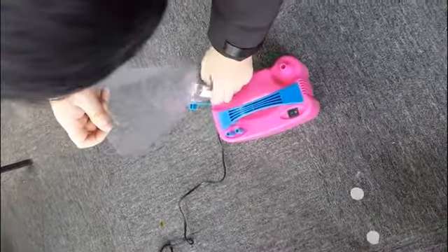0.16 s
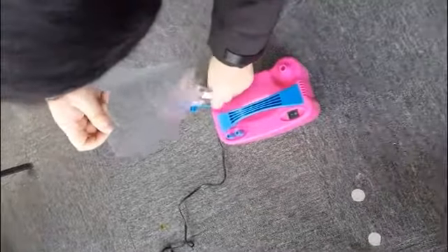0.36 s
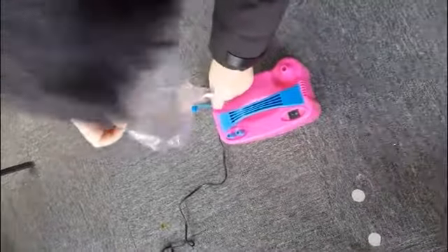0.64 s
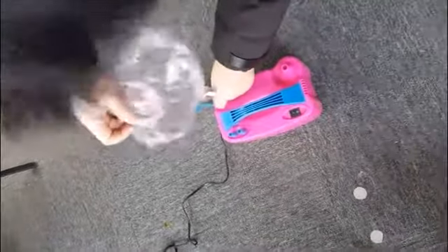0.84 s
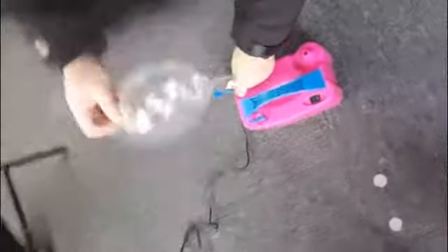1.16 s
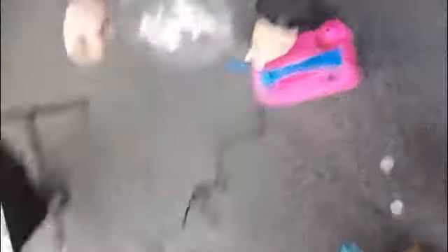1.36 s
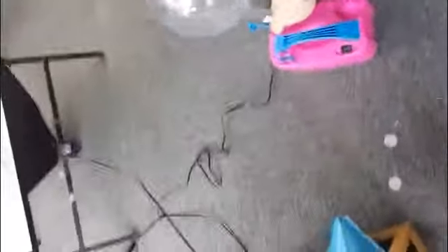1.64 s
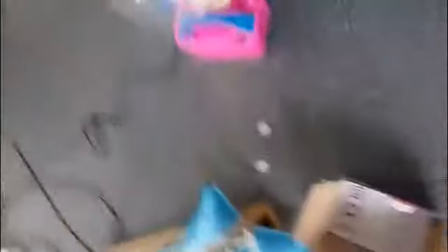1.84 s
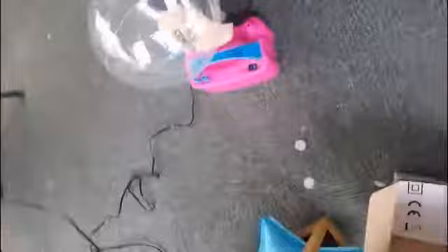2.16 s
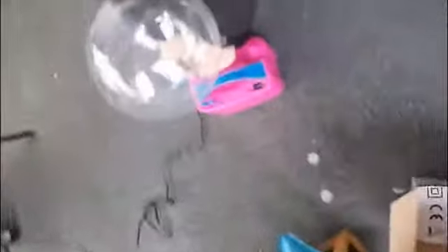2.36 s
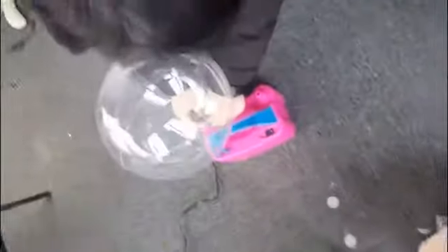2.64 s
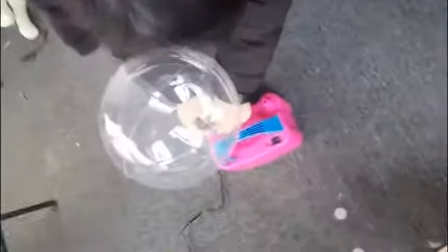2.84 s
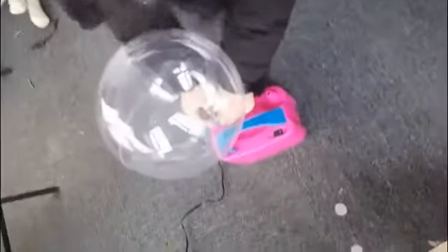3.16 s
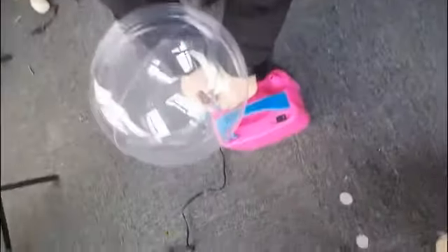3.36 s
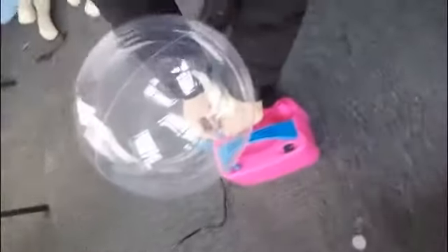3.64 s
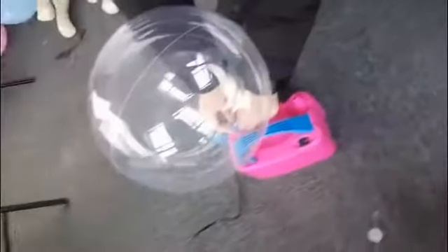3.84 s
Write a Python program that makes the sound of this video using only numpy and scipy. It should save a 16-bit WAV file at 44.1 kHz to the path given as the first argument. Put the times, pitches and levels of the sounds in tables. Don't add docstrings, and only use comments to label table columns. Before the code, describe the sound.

Quiet room hum, then a switch click and an electric blower racing up to speed; limp plastic flutters, then leaking air roars at the nozzle over the constant motor whine, heard close indoors.

```python
import sys
import numpy as np
from scipy import signal
from scipy.io import wavfile
from scipy.ndimage import uniform_filter1d

SR = 44100
rng = np.random.default_rng(int(sys.argv[2]) if len(sys.argv) > 2 else 0)


def master(y):
    cut = np.clip(np.atleast_2d(y).T, -1, 1)
    pcm = np.round(cut * 32767)
    wavfile.write(sys.argv[1], SR, pcm.astype(np.int16))


def volts(x):
    e = np.asarray(x, float) / 20
    return 10 ** e


N = 176400

# f/Hz, level/dB
HUM = [(18, -37), (30, -9), (60, 0), (82, -37.5), (118, -9.5), (598, -20.5), (1260, -16), (2540, -33),
       (14300, -55)]
# t/s, level/dB
HUM_RUSTLE = [(0, -3), (.035, 3), (.075, 0), (.12, -3), (.2, -8), (.3, -0.5), (.43, 0)]
# t/s, peak level/dB, f/Hz
SNAPS = [(.439, -40, 7000), (.441, -33, 1100), (.451, -30, 1380), (.455, -25, 280), (.467, -24, 250),
         (.5, -28, 970), (.475, -26, 2000), (.746, -22, 900), (.785, -17, 1500), (.825, -15, 600),
         (.892, -22, 1200), (2.165, -22, 900), (2.349, -18, 2000)]
# start t/s, length t/s, level/dB, centre f/Hz, width f/Hz
FLAPS = [(0.458, 0.13, -48, 290, 140), (0.45, 0.1, -39.5, 1970, 300), (0.483, 0.092, -42, 950, 220),
         (1.8, 0.36, -45, 300, 180), (0.678, 0.19, -35, 440, 500), (0.805, 0.18, -34.5, 400, 570),
         (0.585, 0.081, -40.5, 950, 210), (2.15, 0.12, -30.5, 740, 830), (2.857, 0.09, -40.5, 270, 86),
         (3.17, 0.97, -44.5, 290, 150), (1.43, 0.62, -51.5, 120, 300), (0.85, 0.122, -48, 146, 150),
         (0.54, .15, -53, 100, 84), (1.43, .2, -49, 310, 160), (2.1, .08, -45, 340, 80),
         (2.29, .07, -32, 6000, 5000), (.97, 0.29, -52.5, 110, 160), (3.3, .4, -37.5, 1180, 430),
         (.88, 0.066, -40.5, 2390, 170)]
# t/s, rush level/dB, leak level/dB, neck resonance f/Hz
AIR = [(.44, -29, -60, 1950), (.48, -30.5, -50, 1950), (.6, -28.5, -42, 2010), (.9, -26.5, -38.5, 2270),
       (1.05, -28.5, -41, 1980), (1.5, -27, -69, 2000), (2.0, -26.5, -42, 2260), (2.28, -25.5, -33, 2120),
       (2.31, -26.5, -29.5, 1960), (2.8, -26, -31.5, 2000), (3.2, -26, -30, 1860), (3.45, -25, -33, 1940),
       (3.65, -24.5, -30.5, 2080), (4.0, -26.5, -28, 2170)]
# f/Hz, level/dB per Hz
RUSH = [(50, -46), (120, -6), (280, -0.5), (700, 1), (1500, 2), (2500, 2), (5000, -1.5), (14300, -4.5)]
# f/Hz, level/dB per halving of speed
RUSH_LAW = [(60, -6.5), (300, 1), (1000, 1.5), (2000, 2), (4000, 5.5), (8000, 8.5), (14000, 14.5)]
# f/Hz, width f/Hz, level/dB
CASING = [(960, 200, 2), (2000, 500, 3.5), (3400, 600, 1.5), (8300, 2500, 2), (10900, 700, -3),
          (12400, 1200, 1)]
# t/s, order 1 level/dB, order 2 level/dB, order 3 level/dB
WHINE = [(0.47, -56, -61, -49), (0.58, -34, -44, -47), (0.66, -37, -35, -35), (0.76, -27.5, -39.5, -32),
         (0.93, -29.5, -31, -36), (1.03, -21, -38.5, -35), (1.17, -15.5, -36, -36.5),
         (1.3, -21, -32.5, -34), (1.45, -28.0, -43.0, -34), (1.6, -34, -40.5, -31),
         (1.8, -25.5, -36, -31.5), (2.1, -23.5, -31.5, -36.5), (2.35, -24, -33.5, -35),
         (2.65, -27.5, -32.5, -30), (3.1, -23.5, -35, -29), (3.45, -25.5, -47, -31),
         (3.7, -30.5, -29.5, -36.5), (3.97, -29.5, -37.5, -34)]
# t/s, order 1 level/dB, order 2 level/dB, order 3 level/dB
WHINE_SIDE = [(0.5, -64.3, -65, -63.3), (0.62, -45, -50.6, -48.6), (0.72, -34, -39, -45.6),
              (0.85, -39, -41, -45.1), (1.0, -42.1, -32, -41.0), (1.12, -34, -42, -42.9),
              (1.3, -32.4, -55, -48.5), (1.45, -26.5, -31, -41.8), (1.62, -30.6, -38, -54),
              (1.8, -35.5, -38, -35.0), (2.1, -32, -38.4, -33.2), (2.35, -33, -32, -30),
              (2.6, -40, -33, -28), (2.85, -37.5, -31.2, -30.2), (3.15, -31, -29, -40),
              (3.45, -32, -30.6, -34.8), (3.7, -32, -28, -44), (3.96, -32.4, -31, -33.4)]
# t/s, order 1 phase/rad, order 2 phase/rad, order 3 phase/rad
SIDE_PHASE = [(.6, 1.8, -.7, -.5), (.85, 1.2, -2.6, -1.1), (1.05, -1.5, -2.8, -1.9), (1.3, 1.1, -3, -2.2),
              (1.65, -.9, -2.9, -2.2), (2.1, -.7, -2.2, -2.1), (2.35, 1.6, -2.8, -3.3),
              (3.15, 1.6, -2.6, -3.5), (3.45, 1.3, -2.1, -5.6), (3.7, 1.4, -4.4, -8.4),
              (3.96, 1.6, -3.6, -7.3)]
HIGH_ORDERS = (4, 5, 7)
# t/s, order 4 level/dB, order 5 level/dB, order 7 level/dB
HIGH_WHINE = [(.5, -60, -58, -57), (.72, -41, -50, -58), (.85, -40, -56, -45), (1.0, -54, -52, -47),
              (1.3, -46, -58, -45), (1.45, -41, -47, -40), (1.62, -39.5, -48, -43),
              (1.8, -47, -44.5, -41.5), (2.1, -43, -46, -45.5), (2.35, -55, -44, -50), (2.6, -44, -50, -54),
              (2.85, -49, -55, -46), (3.15, -58, -58, -49), (3.45, -47, -49, -47), (3.96, -58, -52, -44)]
# f/Hz, width f/Hz, level/dB
STANDING = [(552, 14, 6), (574, 8, -9), (613, 6, -26), (619, 5, 4), (645, 8, 3), (934, 35, 8),
            (1035, 35, 6), (1096, 25, -5), (1140, 20, 4), (1240, 12, -16), (1255, 6, 16), (1266, 9, -14),
            (1545, 60, 9), (1650, 110, -10)]
# f/Hz, correlation/1
SAME = [(40, .5), (90, .8), (160, .95), (300, .95), (500, .8), (1100, .2), (2300, .25), (5000, .04)]
# f/Hz, level/dB
LEFT_DB = [(300, 0), (690, .5), (1260, -1.5), (2300, -1.5), (4300, .3), (8000, -.5), (13000, .6)]

SWITCH_S, SPIN_UP_S = .44, .004
TOP_HZ, SLOW_HZ, SLOW_S, QUICK_S = 666.7, 310, .28, .1
LOAD_S, LOAD_HZ, SAG_HZ_PER_S = 2.35, 2.5, 1.5
FLUTTER_DB, HIGH_FLUTTER_DB, JITTER_HZ = .7, 1.5, .8
SWEEP_FLUTTER_DB = 1.5
NULL_S, NULL_WIDTH_S, NULL_DB = 1.61, .018, -14
BOOST_DB, BOOST_S, BOOST_WIDTH_S = 15, .64, .05
SHADOW_DB, SHADOW_HZ = -3, 12100
NECK_WIDTH_HZ = 520
NECK_LOW, NECK_LOW_DB, NECK_LOW_WIDTH_HZ = 0.58, -11, 1100
HUM_DB = -49.5
ROOM_T60_S, ROOM_DB = .4, -2
RIPPLE_DB = 1.5
BALLOON_CENTRED = 0.75
LEFT_LAG_S = 2.5 / 44100
SIDE_GATE_HZ, SIDE_GATE_DB, SIDE_GATE_PATCHY_DB = 470, -12.5, 3.5
MIC_LOW_HZ, EDGE_HZ = 49, 14240


def evened(x):
    return x / np.sqrt(np.mean(x ** 2) + 1e-20)


def read(points, hz):
    f, value = np.transpose(points)
    return np.interp(np.log(hz + 1), np.log(f + 1), value)


def wander(t, lo, hi):
    rates = np.geomspace(lo, hi, num=16)
    return evened(sum(np.sin(2 * np.pi * (f * t + rng.random())) / np.sqrt(f) for f in rates))


def bump(hz, centre, width):
    return 1 / np.sqrt(1 + (2 * (hz - centre) / width) ** 2)


def smeared(x, bins, frames):
    return uniform_filter1d(uniform_filter1d(x, size=bins, axis=0), size=frames, axis=1)


def grid():
    return np.arange(N // 256 + 5) * 256 / SR, np.fft.rfftfreq(1024, 1 / SR)[:, None]


def noise(gain, patchy_db, flicker_db, centred=0):
    t, hz = grid()
    a, b, c, d, p, q = rng.standard_normal((len(t), 513, 6)).T
    field = patchy_db * evened(smeared(p, 10, 10))
    field += RIPPLE_DB * evened(smeared(q, 3, 40))
    field += flicker_db * wander(t, 4, 30) * np.clip(hz / 3000, 0, 1)
    same = np.clip(np.maximum(read(SAME, hz), centred), -1, 1)
    pan = read(LEFT_DB, hz) / 2
    left = a + 1j * b
    right = same * left + np.sqrt(1 - same ** 2) * (c + 1j * d)
    lag = np.exp(-2j * np.pi * hz * LEFT_LAG_S)
    z = np.array([left * volts(pan) * lag, right * volts(-pan)])
    return signal.istft(z * gain * volts(field) / 12, nperseg=1024, noverlap=768)[1][:, :N]


def room_tone():
    t, hz = grid()
    rustle = np.interp(t, *np.transpose(HUM_RUSTLE)) * np.clip(hz / 5000, 0, 1)
    return volts(HUM_DB) * evened(noise(volts(read(HUM, hz) + rustle), patchy_db=1.0, flicker_db=.8))


def snaps():
    t, out = np.arange(400) / SR, np.zeros(N)
    for s, db, hz in SNAPS:
        at = round(s * SR)
        out[at:at + 400] += volts(db) * np.exp(-t * hz * 1.8) * np.sin(2 * np.pi * hz * t)
    lag = np.arange(SR // 2) / SR
    tail = rng.standard_normal((2, SR // 2)) * volts(-60 * lag / ROOM_T60_S) * (lag > .004)
    tail = tail / np.linalg.norm(tail[0])
    return out + volts(ROOM_DB) * signal.fftconvolve(out[None], tail, axes=1)[:, :N]


def flaps():
    t, hz = grid()
    gain = 0
    for start, length, db, centre, width in FLAPS:
        u = np.clip((t - start) / length, 0, 1)
        swell = np.sin(np.pi * u) ** .4
        gain = gain + volts(db) * evened(bump(hz, centre, width) ** 3) * swell
    return noise(gain, patchy_db=2.5, flicker_db=2.5, centred=BALLOON_CENTRED)


def leak():
    t, hz = grid()
    s, _, level_db, neck = np.transpose(AIR)
    neck = np.interp(t, s, neck)
    main_mode = bump(hz, neck, NECK_WIDTH_HZ) ** 2
    low_mode = volts(NECK_LOW_DB) * bump(hz, NECK_LOW * neck, NECK_LOW_WIDTH_HZ) ** 2
    gain = evened(main_mode + low_mode) * volts(np.interp(t, s, level_db))
    return noise(gain, patchy_db=.5, flicker_db=.8, centred=BALLOON_CENTRED)


def speed(t):
    u = np.maximum(t - SWITCH_S, 0)
    run = TOP_HZ - SLOW_HZ * np.exp(-u / SLOW_S) - (TOP_HZ - SLOW_HZ) * np.exp(-u / QUICK_S)
    return run - LOAD_HZ / (1 + np.exp(-(t - LOAD_S) * 20)) - SAG_HZ_PER_S * np.maximum(t - LOAD_S, 0)


def rush():
    t, hz = grid()
    s, level_db = np.transpose(AIR)[:2]
    ducts = sum(db * bump(hz, f, w) ** 2 for f, w, db in CASING)
    colour = volts(read(RUSH, hz) + ducts)
    law = read(RUSH_LAW, hz) * np.log2(np.clip(speed(t - .006) / TOP_HZ, .05, 1))
    grown = np.clip(t - LOAD_S + .5, 0, 1)
    shadow = SHADOW_DB * grown / (1 + (SHADOW_HZ / (hz + 1)) ** 8)
    gain = evened(colour) * volts(law + shadow + np.interp(t, s, level_db))
    return noise(gain, patchy_db=1.0, flicker_db=0.87)


def whine():
    t = np.arange(N) / SR
    shaft = speed(t)
    jitter = JITTER_HZ * np.interp(t, t[::200], wander(t[::200], 1, 25.05))
    turn = 2 * np.pi * np.cumsum(shaft + jitter) / SR
    climbing = SWEEP_FLUTTER_DB * (1 - shaft / TOP_HZ) ** .5

    def flutter(db):
        return (db + climbing) * np.interp(t, t[::200], wander(t[::200], 1.565, 30))

    mid, side, out = np.transpose(WHINE), np.transpose(WHINE_SIDE), np.zeros((2, N))
    apart, high = np.transpose(SIDE_PHASE), np.transpose(HIGH_WHINE)
    for k in range(1, 4):
        mid_db = np.interp(t, mid[0], mid[k]) + flutter(FLUTTER_DB)
        mid_db += sum(db * bump(k * shaft, f, w) ** 2 for f, w, db in STANDING)
        if k == 1:
            mid_db += NULL_DB * np.exp(-((t - NULL_S) / NULL_WIDTH_S) ** 2)
        side_db = np.interp(t, side[0], side[k]) + flutter(FLUTTER_DB)
        m = volts(mid_db) * np.cos(k * turn)
        s = volts(side_db) * np.cos(k * turn + np.interp(t, apart[0], apart[k]))
        out += np.array([m + s, m - s])
    for row, order in enumerate(HIGH_ORDERS):
        db = np.interp(t, high[0], high[row + 1])
        if row == 0:
            db += BOOST_DB * np.exp(-((t - BOOST_S) / BOOST_WIDTH_S) ** 2)
        for port in range(2):
            out[port] += volts(db + flutter(HIGH_FLUTTER_DB)) * np.cos(order * turn + row * port)
    return np.sqrt(2) * out * (t > SWITCH_S)


def scene():
    powered = np.clip((np.arange(N) / SR - SWITCH_S) / SPIN_UP_S, 0, 1)
    return powered * (whine() + rush() + leak() + flaps()) + snaps() + room_tone()


def joint_bass(x):
    mid_side = np.array([x[0] + x[1], x[0] - x[1]]) / 2
    hz, _, (mid, side) = signal.stft(mid_side, SR, nperseg=2048, noverlap=1024)
    power = smeared(abs(side) ** 2, 5, 2)
    ground = np.exp(uniform_filter1d(np.log(abs(mid[10:140]) ** 2 + 1e-20).mean(0), size=5))
    chance = rng.standard_normal(power.T.shape).T
    patches = SIDE_GATE_PATCHY_DB * evened(smeared(chance, 5, 3))
    weak = (power < ground * volts(2 * (SIDE_GATE_DB + patches))) & (hz[:, None] < SIDE_GATE_HZ)
    lost = signal.istft(side * weak, SR, nperseg=2048, noverlap=1024)[1][:N]
    return x - np.array([lost, -lost])


def low_pass(x):
    return signal.sosfilt(signal.butter(12, 14270, fs=SR, output="sos"), x)


def record(dry):
    bass_cut = signal.butter(3, MIC_LOW_HZ, "high", fs=SR, output="sos")
    thin = signal.sosfilt(bass_cut, dry)
    edge = signal.firwin(511, EDGE_HZ, window=("kaiser", 9), fs=SR)
    mix = joint_bass(signal.oaconvolve(thin, edge[None], "same"))
    return low_pass(mix)


dry = scene()
out = record(dry)
master(out)
```